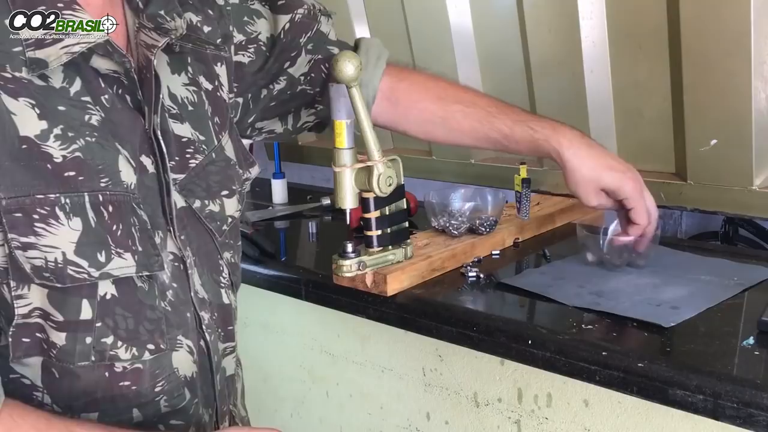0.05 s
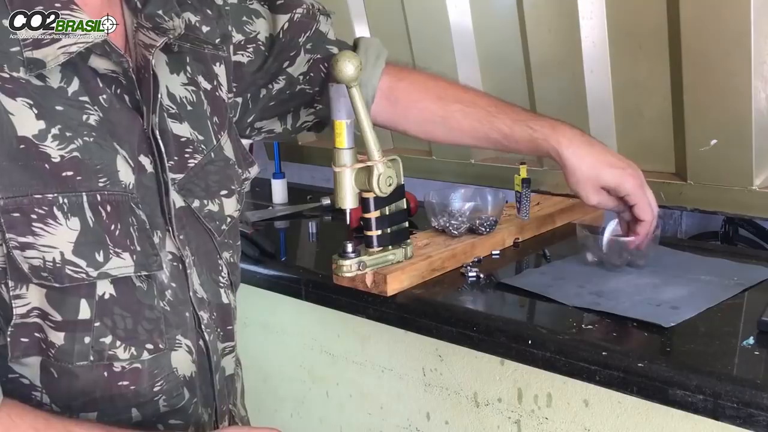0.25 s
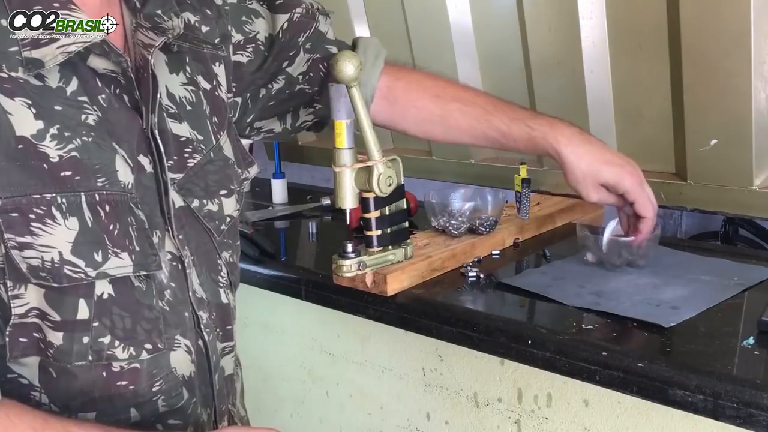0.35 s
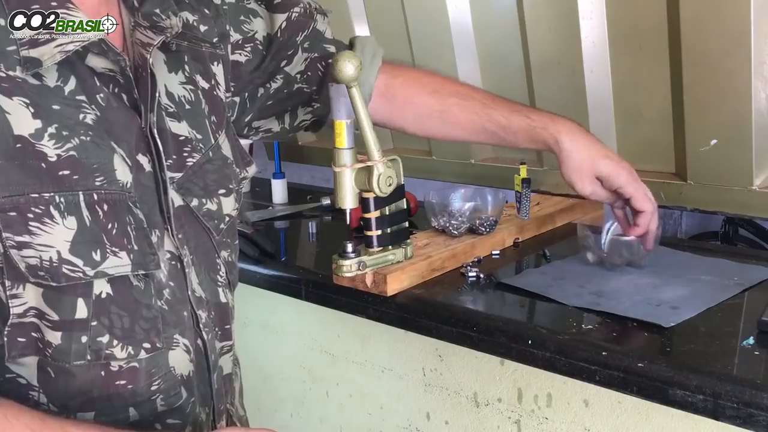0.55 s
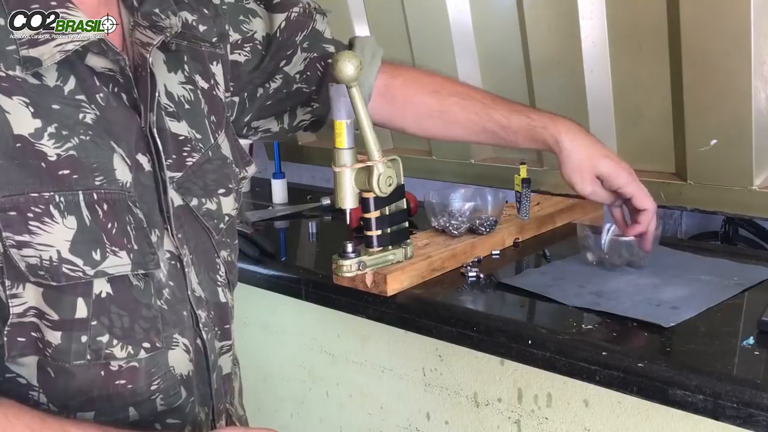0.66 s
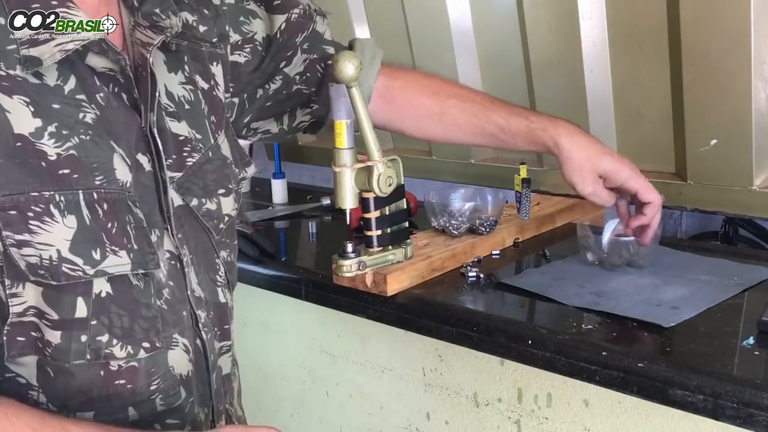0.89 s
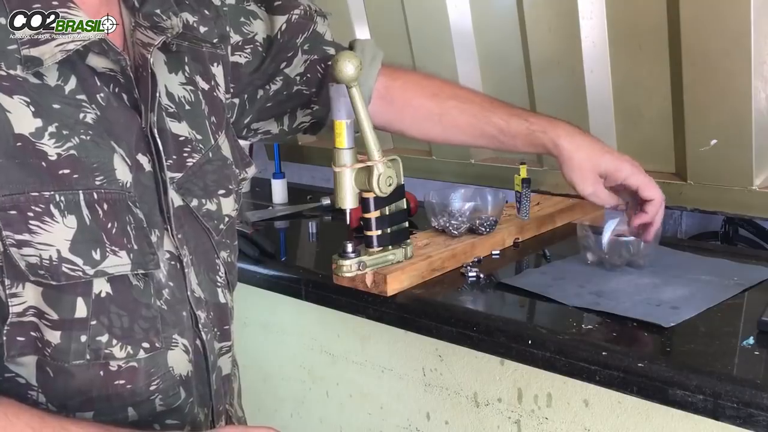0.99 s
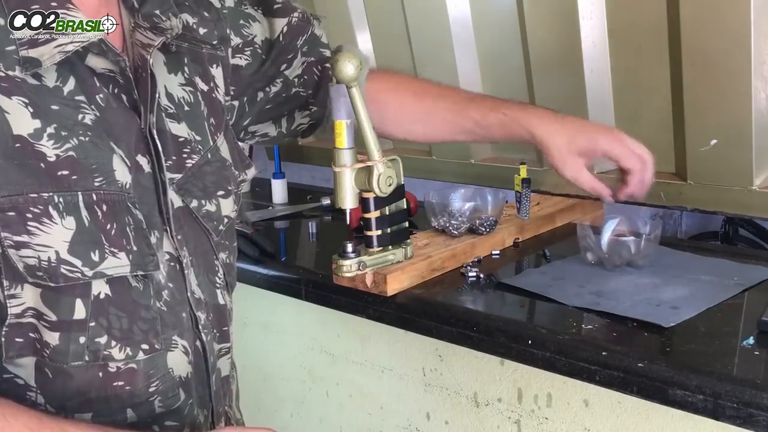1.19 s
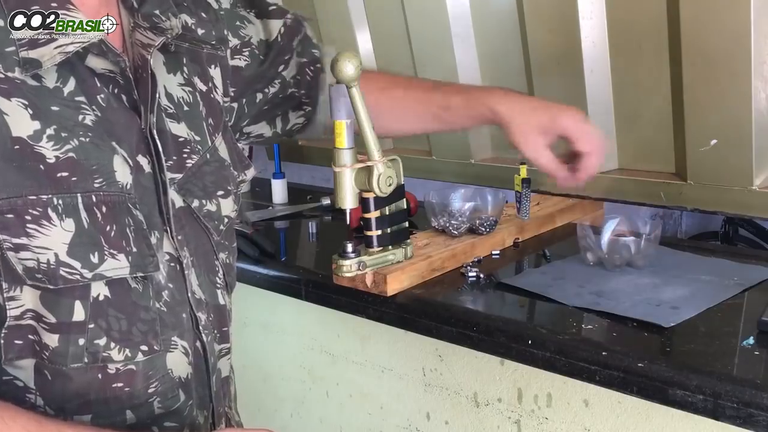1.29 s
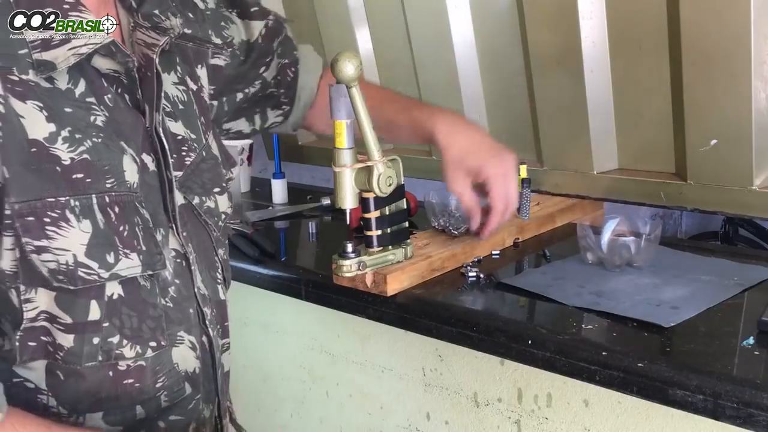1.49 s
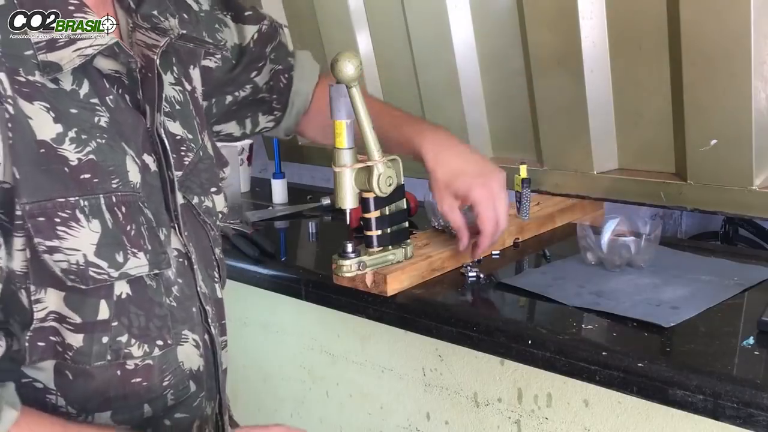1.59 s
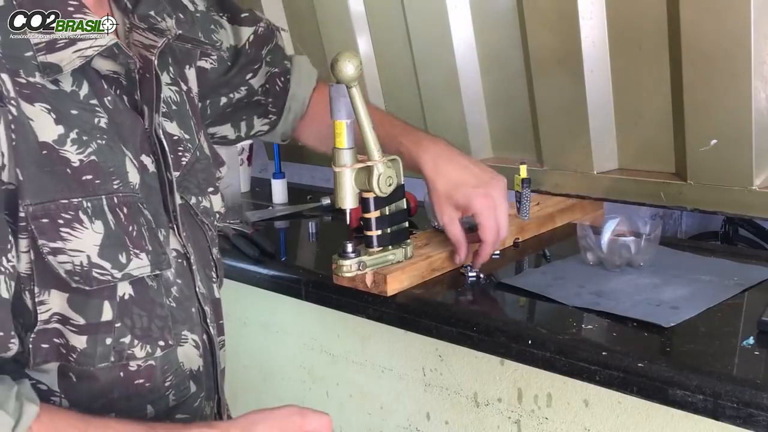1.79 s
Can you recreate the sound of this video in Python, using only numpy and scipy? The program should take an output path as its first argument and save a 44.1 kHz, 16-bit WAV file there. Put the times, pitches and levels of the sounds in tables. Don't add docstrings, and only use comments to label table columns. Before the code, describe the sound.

Small steel balls clink sharply in a glass bowl, stirred by fingers in an echoing shed

```python
import sys
import numpy as np
from scipy import signal
from scipy.io import wavfile
from scipy.ndimage import uniform_filter1d

SR = 44100
rng = np.random.default_rng(int(sys.argv[2]) if len(sys.argv) > 2 else 0)


def invert_db(level):
    return 10 ** (np.asarray(level, dtype=float) / 20)


def master_out(mix):
    frames = np.transpose(np.atleast_2d(mix))
    ceiling = np.clip(frames, -1, 1)
    pcm = np.round(ceiling * 32767).astype(np.int16)
    wavfile.write(sys.argv[1], SR, pcm)


N = 81585

# f/Hz, level per Hz/dB
RUMBLE = [(18, -32), (30, -4), (54, -1.5), (151, -10.5), (193, -10), (242, -21), (350, -21), (460, -51),
          (770, -120)]
# t/s, level/dB
RUMBLE_SWELL = [(0.0, -42), (0.02, -45), (0.128, -47), (0.164, -43.5), (0.262, -53), (0.278, -48.5),
                (1.318, -45.5), (1.4, -48), (1.426, -48), (1.776, -43.5), (1.808, -47.5), (1.85, -42)]
# f/Hz, level per Hz/dB
HISS = [(180, -33), (300, -3), (676, -6), (759, -13.5), (958, -2.5), (1630, -12), (4860, -24),
        (15800, -27.5)]
# t/s, level/dB
ENGINE_SWELL = [(0.0, -50), (0.03, -37), (0.582, -53), (0.608, -49.5), (0.792, -44.5), (0.844, -33),
                (1.216, -36), (1.272, -44), (1.85, -69)]
# t/s, level/dB
RUSTLE = [(0, -49), (.15, -48), (.4, -50), (.7, -52.5), (.9, -56), (1.15, -60), (1.4, -44.5), (1.62, -57),
          (1.85, -58)]
# t/s, f/Hz, level/dB
BUMPS = [(.209, 1340, -21.5), (.2545, 860, -28.5), (1.222, 920, -23.5), (1.249, 1580, -26),
         (0.32, 1820, -49), (.333, 2580, -48), (.462, 1836, -38.5), (.464, 3430, -36.5), (1.561, 1400, -34),
         (1.56, 1900, -35), (1.596, 1710, -31.5), (1.598, 2420, -43), (1.599, 930, -44), (1.604, 1710, -40),
         (1.611, 2257, -36), (1.62, 1370, -42.5), (1.66, 1520, -49), (1.695, 2820, -45), (1.746, 1730, -46),
         (1.782, 1550, -41), (1.799, 1383, -42.5), (0.017, 2700, -41), (0.081, 2800, -41.5)]
# f/Hz, level/dB, t60/s
BODY = [(1320, -3, 0.12), (1416, -3.5, 0.09), (1550, 4, 0.015), (1840, 9, 0.015), (2019, 4, 0.032),
        (2304, -2, 0.039), (2608, 5, 0.022), (2900, -4, 0.031), (3355, -2.5, .01), (3655, -0.5, 0.031)]
# f/Hz, level/dB, t60/s
WALL = [(4590, -9, 0.0058), (5100, -16.5, 0.0052), (5600, -8, 0.0088), (6120, 8, 0.00505),
        (6440, 12.5, 0.015), (6960, 8, 0.0093)]
# f/Hz, level/dB, t60/s
RIM = [(7980, -14, 0.00605), (8540, -6, .006), (9060, -4, 0.0055), (9520, -8, 0.0032), (10300, -13, 0.0033)]
# f/Hz, level/dB, t60/s
BALL = [(11770, -3.5, 0.0027), (12430, 1, 0.0048), (13500, -11, .004), (14160, -3, 0.0033),
        (15250, -8, 0.0038)]
# t/s, wall level/dB, body level/dB, rim level/dB, ball level/dB
STIR = [(0.0173, -30.5, -34.5, -42.5, -44), (0.034, -38, -39.5, -47, -49), (0.0434, -41, -68, -48, -40),
        (0.0614, -44, -47, -45, -53.5), (0.0805, -37, -32, -37.5, -36.5), (0.098, -33, -39, -48, -44),
        (0.1206, -43.5, -41, -49, -46), (0.3285, -34, -33.5, -48, -45), (0.445, -40, -51, -57, -47.5),
        (0.4602, -26.5, -39, -56.5, -36.5), (0.5985, -37.5, -46.5, -53, -50), (0.619, -33, -59, -54, -51),
        (0.6449, -48, -43.5, -50, -50), (0.699, -51, -47, -55, -56), (0.7407, -48, -43.5, -57.5, -50)]
# t/s, wall level/dB, body level/dB, rim level/dB, ball level/dB
SETTLE = [(1.0341, -42.5, -67, -63.5, -55), (1.2922, -31, -36, -44.5, -43.5),
          (1.3281, -27, -32, -39, -38.5), (1.3565, -29.5, -44, -42.5, -49.5),
          (1.37, -28.5, -34.5, -39.5, -39), (1.3911, -28, -39, -40.5, -42.5), (1.401, -33, -43, -40, -48),
          (1.4294, -24, -53, -45, -50), (1.5621, -46, -45.5, -52, -53), (1.5976, -38, -38, -52, -47),
          (1.6059, -54.5, -38, -55, -55), (1.6118, -44, -43.5, -55, -55), (1.6182, -40, -56, -51.5, -56),
          (1.66, -38, -50.5, -61.5, -54.5), (1.693, -38, -50.5, -54, -54.5),
          (1.7463, -72.5, -52, -68.5, -59.5)]
HARD_TIMES = [
    .2085,
    .2533,
    1.2218,
    1.2482,
    1.4597,
]
# wall level/dB, body level/dB, rim level/dB, ball level/dB
HARD_LEVELS = [(4.5, -21.5, -11, -12), (-3.5, -34, -16, -18.5), (-16.5, -23.5, -26, -22.5),
               (-8.5, -22.5, -21, -23), (-12, -37, -30.5, -45)]
# f/Hz, width/Hz, level/dB
SPOTS = [
    [(5940, 540, -0.5), (7140, 340, 1), (7640, 180, -14.5), (9250, 460, 4.5), (10900, 430, -12),
     (11480, 260, -9), (12100, 490, -8.5), (15100, 360, -20.5)],
    [(4200, 400, -9), (5240, 210, -34), (6490, 390, -6), (7500, 500, 0), (9870, 330, 1), (11340, 660, -1),
     (15100, 260, -14)],
    [(4830, 260, -3), (5650, 160, -6.5), (7350, 260, -2.5), (8700, 280, 3), (10200, 360, -8.5),
     (12700, 270, 2), (14200, 720, -6)],
    [(4320, 190, -7), (6240, 460, 2.5), (8500, 210, -4), (11000, 370, -5.5), (12400, 270, -11),
     (13100, 240, -12), (14490, 540, -9)],
    [(7000, 370, 2), (8600, 260, -4), (10000, 170, -8), (10900, 340, -10.5), (13300, 340, -23),
     (14500, 650, -30.5)],
]
SPOT_LEVELS = [-4, -17.5, -25.5, -16.5, -25]
# f/Hz, level/dB, t60/s
BENCH = [(767.4, 0, 0.054)]
# t/s, level/dB
KNOCKS = [(.018, -60), (.08, -47), (.2095, -30), (.255, -35.5), (.33, -43), (.46, -53), (1.2222, -23.5),
          (1.249, -29.5), (1.292, -36), (1.328, -37), (1.37, -41), (1.46, -44), (1.598, -43)]
# f/Hz, level/dB, t60/s
GLASS = [(757, -5, .25), (1290, -6, .1), (1373, -2, .35), (1416, 0, .35), (1660, -10, .3), (1985, -4, .4),
         (2045, -5, .3), (2690, -8, .45), (3390, -10, .25)]
# t/s, level/dB
BLOWS = [(.018, -75), (.08, -58), (.209, -41), (.254, -45.5), (.33, -43.5), (.46, -60), (.495, -63),
         (1.222, -38.5), (1.249, -43), (1.328, -48), (1.37, -54), (1.46, -62)]
# t/s, level/dB
TICKS = [(0.0384, -35.5), (0.0624, -27.5), (0.6547, -31), (0.7253, -45), (0.8394, -44), (0.8568, -33),
         (0.9283, -35.5), (0.9344, -38.5), (0.9414, -45.5), (0.9548, -47), (0.9644, -50), (0.9727, -32.5),
         (1.0486, -55), (1.068, -42), (1.0764, -48), (1.0824, -31), (1.0916, -33), (1.0954, -41.5),
         (1.1014, -50.5), (1.1084, -61), (1.2022, -34), (1.2061, -26.5), (1.212, -28.5), (1.639, -34.5),
         (1.8312, -45)]
# t/s, level/dB
MORE_TICKS = [(0.3187, -34.5), (0.3324, -37), (0.3464, -39), (0.3614, -40), (0.3714, -43.5), (0.4774, -45.5),
              (0.4894, -44), (0.612, -40.5), (0.6389, -39.5), (0.6534, -40), (0.7144, -50), (1.3804, -35.5),
              (1.6124, -45.5), (1.6744, -52.5), (1.7044, -61.5), (1.7374, -50)]
# t/s, level/dB
GRAZES = [
    (.186, -53.5),
    (.198, -59),
    (.222, -38.5),
]
# f/Hz, t60/s, level/dB
SHED = [(724, 0.25, -4), (1380, 0.92, -3), (2956, .85, -5.5), (5340, 1, -16), (7700, 0.82, -13.5),
        (10500, 0.6, -17), (14500, .4, -22)]

HISS_DB, FLICKER_DB = -55.5, 0.5
ENGINE_HZ, ENGINE_WIDTH_HZ = 92.4, 12
RUSTLE_HZ, RUSTLE_WIDTH_HZ, RUSTLE_GRAIN_DB = 1700, 2200, 1.5
BUMP_ATTACK_S, BUMP_T60_S = .0006, .036
WALL_DB, BODY_DB, RIM_DB, BALL_DB = -14.5, -3, -4, -6.5
BRIGHT_T60_MAX_S, BODY_T60_MAX_S, ASIDE_T60_S = .009, .1, .0035
HARD_CHAIN_S, SOFT_CHAIN_S, TICK_CHAIN_S = .003, .0027, .0035
CHAIN_FADE_DB, CONTACT_SCATTER_DB, HARD_CHAIN_DB = -5, 6.5, -6.5
MODE_SCATTER_DB, CLINK_SCATTER_DB, DETUNE = 2.5, 4, 0.017
SPOT_ATTACK_S, SPOT_HOLD_S, SPOT_ASIDE_DB = .0003, .0015, -1
TICK_DB, MORE_TICKS_DB, LOW_ASIDE_DB = -21, -12, -1.5
BRIGHT_CUT_HZ, LOW_CUT_HZ = 3300, 778
EARLY_T60_S, EARLY_DB, TAIL_START_S = 0.14, -3.5, 0.00068
RUMBLE_CUT_HZ, TOP_HZ, OVERLOAD_CUT_HZ, CEILING = 36, 15800, 650, 1.0


def unit(x):
    return x / np.sqrt(np.mean(x ** 2) + 1e-20)


def band(x, hz, width_hz):
    lo = max(hz - width_hz / 2, 5)
    hi = min(hz + width_hz / 2, SR * .49)
    return signal.sosfilt(signal.butter(2, [lo, hi], "band", fs=SR, output="sos"), x)


def high_pass(x, order, hz):
    return signal.sosfilt(signal.butter(order, hz, "high", fs=SR, output="sos"), x)


def decay(t, t60):
    return np.exp(-np.log(1000) * t / t60)


def curve(rows):
    return np.interp(np.arange(N) / SR, *np.array(rows).T)


def walk(rate_hz):
    k = int(SR / rate_hz)
    steps = np.repeat(rng.standard_normal(N // k + 1), k)
    smooth = uniform_filter1d(uniform_filter1d(steps, k), k)
    return unit(smooth[:N])


def add(out, at_s, sound):
    i = int(at_s * SR)
    out[:, i:i + sound.shape[1]] += sound[:, :N - i]


def colour(table, lo_hz, count):
    table_hz, table_db = np.array(table).T
    out = 0
    for hz in lo_hz * 2 ** (np.arange(count) / 2):
        db = np.interp(np.log(hz), np.log(table_hz), table_db) + FLICKER_DB * walk(2.6)
        out = out + invert_db(db) * band(rng.standard_normal(N), hz, hz * .35)
    return unit(out)


def floor():
    rumble = colour(RUMBLE, 38, count=7)
    hiss = colour(HISS, 400, count=12)
    return rumble * invert_db(curve(RUMBLE_SWELL) + 3) + hiss * invert_db(HISS_DB)


def engine():
    drone = unit(band(rng.standard_normal(N), ENGINE_HZ, ENGINE_WIDTH_HZ))
    return drone * invert_db(curve(ENGINE_SWELL) - 7)


def rustle():
    grains = rng.standard_normal(N) * invert_db(RUSTLE_GRAIN_DB * walk(90))
    return unit(band(grains, RUSTLE_HZ, RUSTLE_WIDTH_HZ)) * invert_db(curve(RUSTLE))


def bumps():
    out = np.zeros((2, N))
    t = np.arange(2048) / SR
    shape = (1 - np.exp(-t / BUMP_ATTACK_S)) * decay(t, BUMP_T60_S)
    for at, hz, db in BUMPS:
        wave = invert_db(db) * np.sin(2 * np.pi * hz * t) * shape
        add(out, at, np.array([wave, wave]))
    return out


def ring(modes, chance, t60_max, scatter_db=MODE_SCATTER_DB):
    hz, db, t60 = np.array(modes).T[:, :, None]
    t = np.arange(4096) / SR
    k = len(modes)
    pitch = hz * (1 + DETUNE * chance[:k, None])
    level = invert_db(db + scatter_db * chance[k:2 * k, None])
    waves = np.sin(2 * np.pi * pitch * t) * decay(t, np.clip(t60, .002, t60_max))
    return (level * waves).sum(axis=0)


def strike(modes, length_s, db, t60_max, count=10, scatter_db=MODE_SCATTER_DB):
    place, size, chance = rng.random(count), rng.standard_normal(count), rng.standard_normal(32)
    place = (np.arange(count) + np.r_[0, place[1:]]) / count
    push = np.sign(size) * invert_db(CHAIN_FADE_DB * place + CONTACT_SCATTER_DB * np.abs(size))
    chain = np.bincount((place * length_s * SR).astype(int), push)
    front = signal.fftconvolve(ring(modes, chance, t60_max, scatter_db), chain)[:4096]
    aside_t60 = t60_max if t60_max == BODY_T60_MAX_S else ASIDE_T60_S
    aside = ring(modes, chance[::-1], aside_t60)
    both = np.array([front, aside])
    loudness = np.sqrt(np.mean(both[:, :353] ** 2, axis=1, keepdims=True))
    return both * invert_db(db) / loudness


def clinks():
    low, bright = np.zeros((2, N)), np.zeros((2, N))
    hard = [(at, *levels) for at, levels in zip(HARD_TIMES, HARD_LEVELS)]
    soft = list(STIR) + list(SETTLE)
    for table, chain_s, chain_db in ((hard, HARD_CHAIN_S, HARD_CHAIN_DB), (soft, SOFT_CHAIN_S, 0)):
        for at, wall_db, body_db, rim_db, ball_db in table:
            add(low, at, strike(BODY, 0, body_db + BODY_DB, BODY_T60_MAX_S, count=1))
            parts = ((WALL, wall_db + WALL_DB), (RIM, rim_db + RIM_DB), (BALL, ball_db + BALL_DB))
            for modes, db in parts:
                add(bright, at, strike(modes, chain_s, db + chain_db, BRIGHT_T60_MAX_S,
                                       scatter_db=CLINK_SCATTER_DB))
    return low, bright


def knocks():
    out = np.zeros((2, N))
    for at, db in KNOCKS:
        add(out, at, strike(BENCH, 0, db, BODY_T60_MAX_S, count=1))
    return out


def glass():
    hz, db, t60 = np.array(GLASS).T[:, :, None]
    t, out = np.arange(SR // 2) / SR, np.zeros((1, N))
    waves = np.sin(2 * np.pi * hz * t) * decay(t, t60)
    for at, blow_db in BLOWS:
        spread_db = rng.standard_normal(hz.shape)
        add(out, at, (invert_db(blow_db + db + spread_db) * waves).sum(axis=0)[None])
    return out[0]


def light_contacts(table, modes, db):
    out = np.zeros((2, N))
    for at, tick_db in table:
        add(out, at, strike(modes, TICK_CHAIN_S, tick_db + db, BRIGHT_T60_MAX_S, count=4))
    return out


def ticks():
    return light_contacts(TICKS, BALL, TICK_DB) + light_contacts(MORE_TICKS, BALL, MORE_TICKS_DB)


def grazes():
    return light_contacts(GRAZES, RIM, 0)


def spot(peaks, db):
    hz, width_hz, peak_db = np.array(peaks).T[:, :, None]
    t = np.arange(2048) / SR
    damping = np.exp(-np.pi * width_hz * np.clip(t - SPOT_HOLD_S, 0, 1))
    shape = np.clip(t / SPOT_ATTACK_S, 0, 1) * damping
    waves = invert_db(peak_db + db) * np.sin(2 * np.pi * hz * t)
    front = (waves * shape).sum(axis=0)
    crack = invert_db(SPOT_ASIDE_DB) * waves.sum(axis=0) * decay(t, ASIDE_T60_S / 2)
    return np.array([front, crack])


def hard_spots():
    out = np.zeros((2, N))
    for at, peaks, db in zip(HARD_TIMES, SPOTS, SPOT_LEVELS):
        add(out, at, spot(peaks, db))
    return out


def balls():
    low, bright = clinks()
    low = low + bumps() + knocks()
    bright = bright + ticks() + grazes() + hard_spots()
    out = low * invert_db([[0], [LOW_ASIDE_DB]]) + high_pass(bright, 3, BRIGHT_CUT_HZ)
    return high_pass(out, 6, LOW_CUT_HZ)


def shed(x):
    t = np.arange(SR) / SR

    def tail(noise, t60, db):
        fade = decay(t, t60) * np.clip(t / TAIL_START_S - 1, 0, 1)
        return invert_db(db) * noise * fade / np.sqrt(np.sum(fade ** 2))

    answer = tail(rng.standard_normal(SR), EARLY_T60_S, EARLY_DB)
    for hz, t60, db in SHED:
        answer = answer + tail(band(rng.standard_normal(SR), hz, hz * 0.65), t60, db)
    return x[0] + signal.fftconvolve(x[1], answer)[:N]


def scene():
    background = floor() + engine() + rustle()
    return (background + shed(balls()) + glass())[None]


def low_pass(x):
    return signal.sosfilt(signal.butter(12, 15930, fs=SR, output="sos"), x)


def record(dry):
    cut = high_pass(dry, 4, RUMBLE_CUT_HZ)
    cut = signal.sosfilt(signal.butter(12, TOP_HZ, fs=SR, output="sos"), cut)
    no_thump = signal.butter(3, OVERLOAD_CUT_HZ, "high", fs=SR, output="sos")
    for _ in range(3):
        over = cut - np.clip(cut, -CEILING, CEILING)
        cut = cut - signal.sosfiltfilt(no_thump, over)
    return low_pass(np.clip(cut, -CEILING, CEILING))


dry = scene()
out = record(dry)
master_out(out)
```